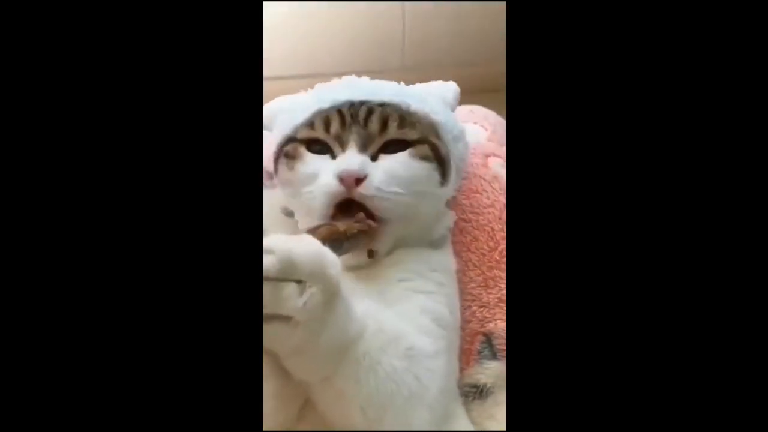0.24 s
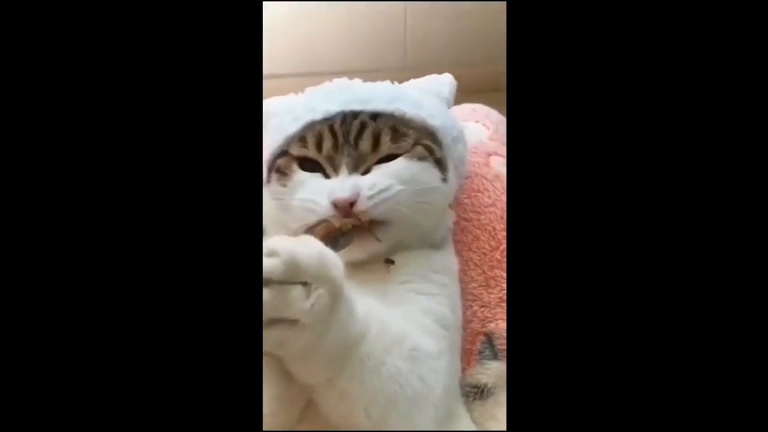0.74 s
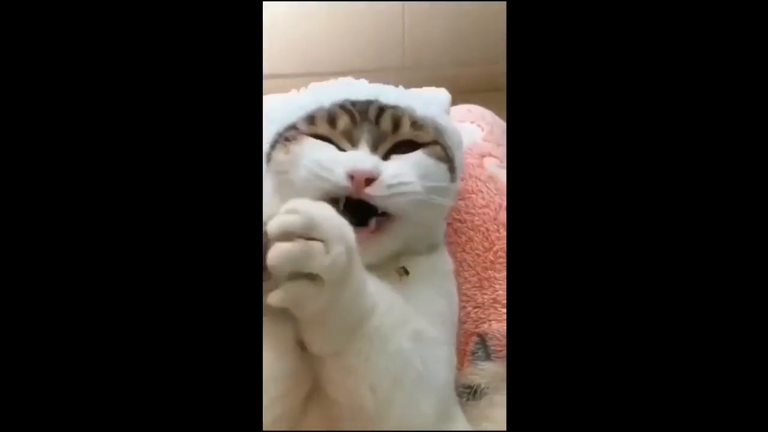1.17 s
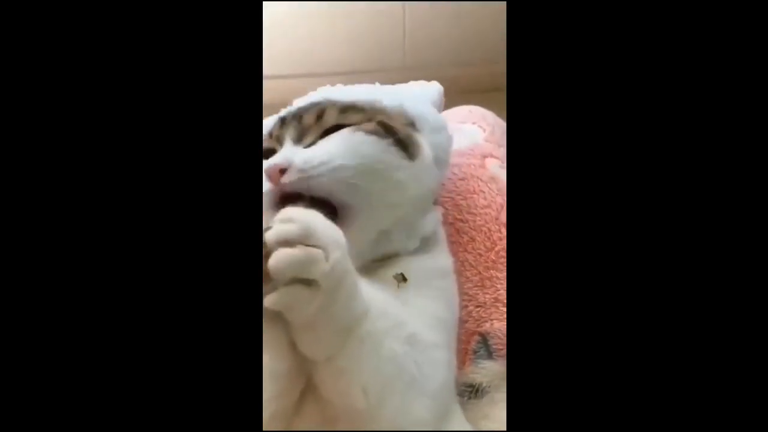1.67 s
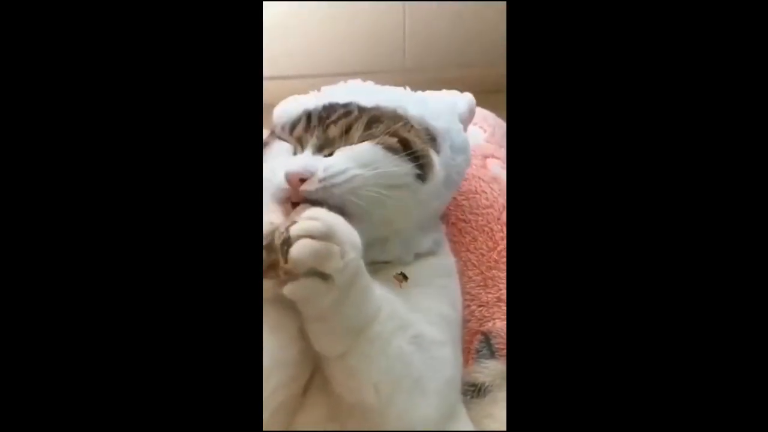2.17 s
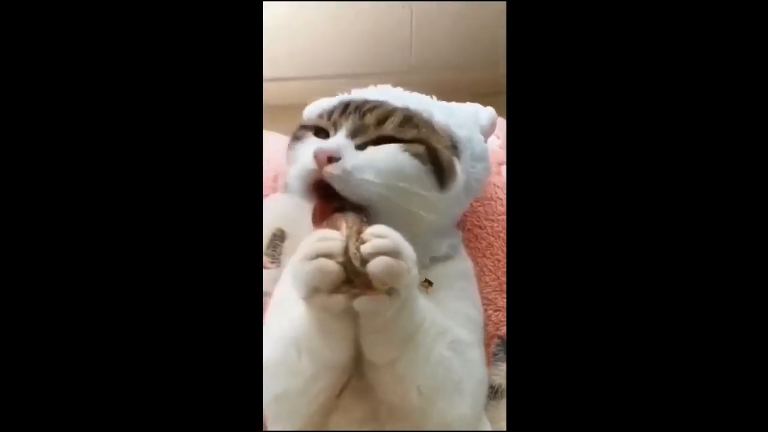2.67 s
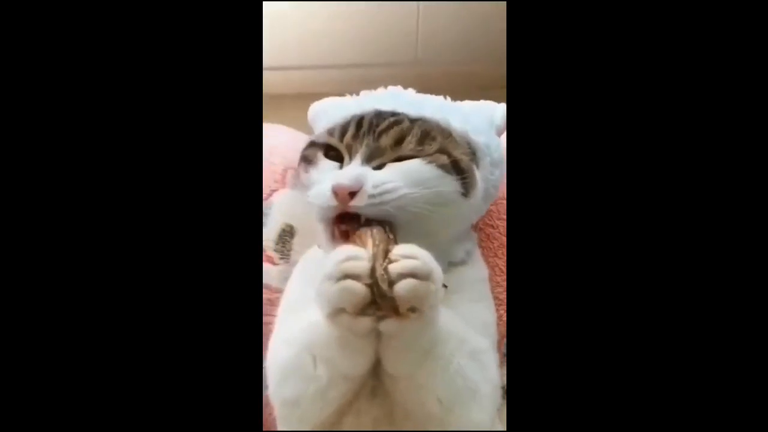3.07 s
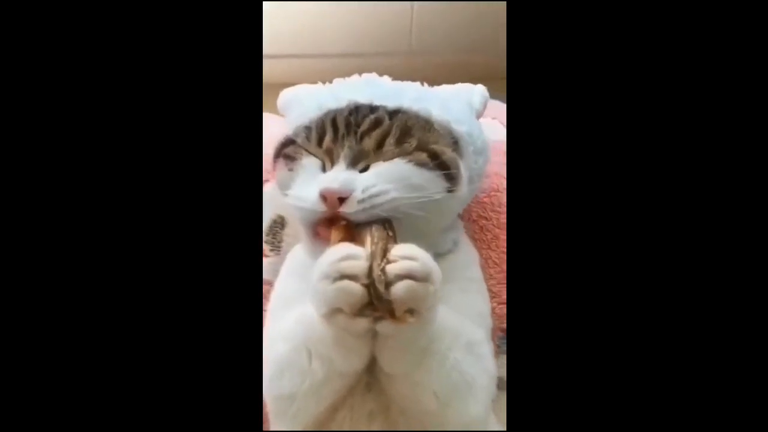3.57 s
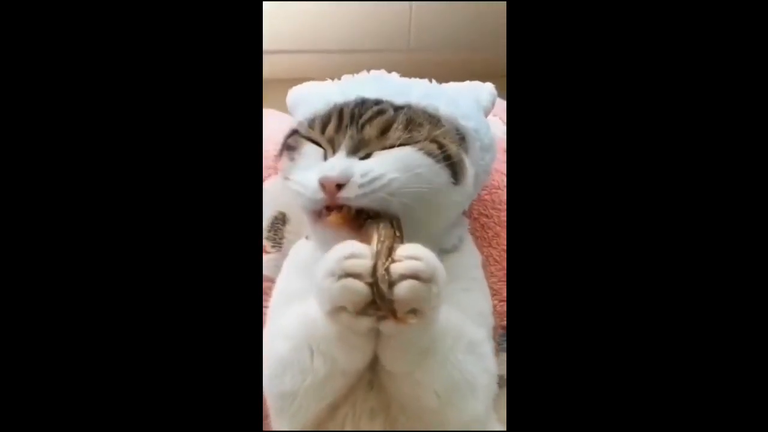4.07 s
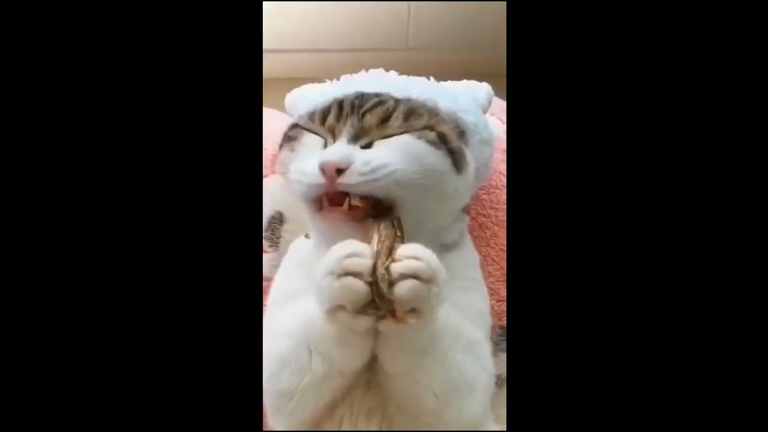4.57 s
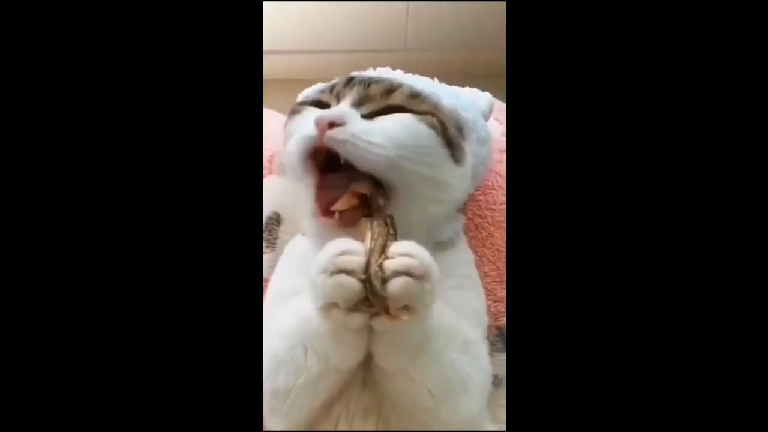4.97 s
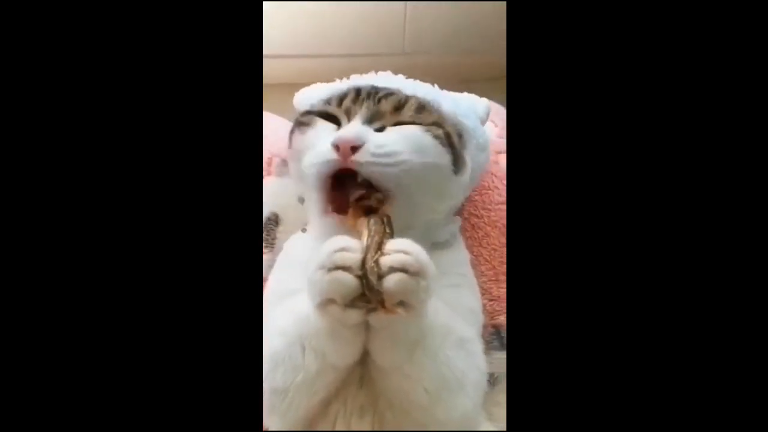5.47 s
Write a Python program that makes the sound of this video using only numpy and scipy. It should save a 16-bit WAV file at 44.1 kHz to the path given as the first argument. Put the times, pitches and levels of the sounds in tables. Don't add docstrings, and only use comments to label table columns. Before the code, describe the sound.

Close, loud crunching as a cat's teeth crack and grind a brittle treat, over air rumble and faint quiet-room hush.

```python
import sys
import numpy as np
from scipy import signal
from scipy.fft import rfft, irfft
from scipy.io import wavfile
from scipy.ndimage import uniform_filter1d

SR = 44100
rng = np.random.default_rng(int(sys.argv[2]) if len(sys.argv) > 2 else 0)


def int16_out(signal):
    q = np.round(np.clip(np.atleast_2d(signal).T, -1, 1) * 32767)
    wavfile.write(sys.argv[1], SR, q.astype(np.int16))


def boost_factor(decibels):
    exponent = np.asarray(decibels, float) / 20
    return 10 ** exponent


N = 252693

# frequency in Hz, density in dB per Hz.
ROOM_TONE = [(41, -32), (70, 3), (634, -17), (1410, -18), (2620, -22), (5070, -25.5), (9600, -36.5),
             (12500, -74)]
# start in seconds, hold in seconds, level in dB, swing in Hz.
PUFFS = [(0.0, 0.11, -11, 36.2), (0.164, 0.025, -10, 28.33), (.24, 0.048, -20, 35.2),
         (0.321, 0.11, -9.5, 33.5), (.5, 0.076, -17, 40.1), (.655, 0.022, -14.5, 36.3),
         (.73, 0.088, -21.5, 42.15), (0.881, 0.058, -24, 42), (1.011, .04, -27.5, 43.15),
         (1.339, 0.076, -29, 52.2), (1.66, 0.029, -26, 43.05), (2.2, .03, -34, 44.8),
         (2.525, 0.082, -8.5, 38.1), (2.681, 0.074, -6.5, 34.35), (2.792, 0.044, -4.5, 34.4),
         (2.99, 0.056, -27, 48.1), (3.09, 0.077, -23, 58.8), (3.23, 0.044, -23.5, 49.6),
         (3.549, 0.12, -35, 43.03), (3.992, 0.032, -14.5, 43.8), (4.039, 0.056, -24, 46.8),
         (4.2, 0.16, -17.5, 43.84), (4.888, 0.047, -19, 44.3), (5.04, 0.033, -29.5, 44.1),
         (5.22, .13, -30, 44.5), (5.45, 0.043, -31, 43.5)]
# frequency in Hz, width in Hz, level in dB.
CRUMB_MODES = [(1725, 400, -4.5), (2550, 565, -1.5), (3300, 1075, -6.5)]
# frequency in Hz, width in Hz, level in dB.
JAW_MODES = [(280.5, 168, 3), (433, 82, 6.5), (508, 101, 4.5), (1110, 330, 6.5), (1270, 1500, -10.5)]
# frequency in Hz, width in Hz, level in dB.
BRITTLE_MODES = [(4184, 540, 7.5), (6380, 1620, 8), (8670, 1700, 2.5), (8964, 390, 4.5)]
# middle in
# seconds, half length in seconds, ring in Hz, width in Hz, level in dB.
LICKS = [(0.043, 0.049, 1132, 80, -33.5), (0.074, 0.019, 2100, 600, -29), (0.374, 0.027, 2000, 600, -35),
         (0.429, 0.027, 2370, 583.2, -29.5), (0.78, 0.038, 2320, 460, -37),
         (0.914, 0.025, 1020, 270, -31.5), (0.928, 0.033, 1790, 320, -36), (1.755, 0.059, 284, 100, -27),
         (1.769, 0.024, 1200, 230, -22.5), (1.973, 0.06, 1081, 324, -17.5), (2.588, 0.015, 349, 190, -17.5),
         (3.404, 0.0083, 1080, 340, -12), (3.635, 0.014, 9200, 600, -26.5), (3.762, 0.1, 1850, 450, -30),
         (3.907, 0.026, 3300, 460, -17), (4.406, 0.022, 9140, 600, -34), (4.468, 0.029, 1809, 200, -31.5),
         (4.65, 0.049, 2840, 540, -16.5), (4.86, 0.038, 9050, 603, -27.5), (5.645, 0.12, 2570, 370, -37)]
# start in seconds, peak in dB, ring in Hz, T60 in seconds.
KNOCKS = [(0.746, -21, 506, 0.021), (0.869, -14.5, 384, 0.081), (1.093, -17.5, 319.6, 0.05),
          (1.217, -1.5, 1110, 0.027), (1.266, -4, 1034, 0.063), (1.344, -9, 946, 0.033),
          (1.466, -6, 567, 0.041), (1.55, -12.5, 950, 0.019), (1.767, -10, 1095, 0.045),
          (1.9, -3, 1306, 0.044), (1.945, -0.5, 1170, 0.06), (2.009, 1, 1110, 0.058),
          (2.215, -6, 1496, 0.15), (2.331, -5, 1490, 0.03), (2.389, -13, 1360, 0.047),
          (2.431, -7, 485, 0.05), (2.583, -24, 367, 0.05), (3.274, -8.5, 416, 0.027),
          (3.399, -5, 480, 0.063), (3.474, -17, 951, 0.028), (3.521, -11.5, 1010, 0.025),
          (3.965, -7, 330, 0.057), (4.084, -12.5, 500, 0.034), (4.209, -9, 484, 0.021),
          (4.25, -1.5, 477, 0.068), (4.743, -6, 396, 0.064), (4.849, -3.5, 411, 0.066),
          (5.205, -12, 990, 0.075), (5.245, -5, 1090, 0.04), (5.459, -6, 395, 0.068)]
# time in seconds, peak in dB, ring in Hz,
# splinters in dB above the ring.
FIRST_CRACKS = [(0.3386, -2, 2150, -35), (0.7442, -5, 2320, -39), (0.841, -7.5, 3960, -18),
                (1.1073, 1, 2590, -24), (1.1787, -9, 2420, -21), (1.2193, 3.5, 2480, -30),
                (1.269, 5.5, 1760, -25), (1.3068, -1.5, 2270, -13.5), (1.3473, 3, 2270, -13),
                (1.3877, -10, 2470, -12), (1.4103, -4, 2430, -8.5), (1.4568, 0, 2520, -5.5),
                (1.5508, -6.5, 2580, -23), (1.6626, -5, 2230, -9), (1.7386, -10, 2300, -3.5),
                (1.9054, 4, 2220, -14), (1.9383, 8, 2080, -18), (2.0316, -8, 2460, -2.5),
                (2.058, -21, 2550, -7), (2.112, -3.5, 2230, -8), (2.1304, -1.5, 2430, -7),
                (2.1964, -2.5, 2900, -10), (2.271, -0.5, 2480, -9.5), (2.3922, 2, 2380, -18),
                (2.43, 3, 3700, -14), (2.5397, -1, 2314, -12.5), (2.5804, -5, 2950, -28),
                (2.606, -7, 2424, -20), (2.6873, -1, 2270, -17), (2.7926, -8, 2267, -10)]
# time in seconds, peak in dB, ring in Hz,
# splinters in dB above the ring.
LATER_CRACKS = [(2.8898, -11, 2458, -8), (3.1812, -14, 2412, -7), (3.216, -9, 2314, -32),
                (3.256, -15, 2560, -8), (3.3978, -5.5, 2060, -8), (3.4753, -9.5, 2423, -1.5),
                (3.5144, -5.5, 2540, -3), (3.6252, -13.5, 2200, -7.5), (3.665, -6, 1750, -16.5),
                (3.7344, -13.5, 2800, -31), (3.8429, -16.5, 3180, -2), (3.8778, -7, 3230, -27),
                (3.9007, 2.5, 2810, -11), (3.966, 0.5, 2570, -12.5), (4.0826, -8, 2870, 0),
                (4.1173, -6, 1930, -2), (4.206, -11.5, 2560, -2.5), (4.2496, -10, 1880, -6),
                (4.4398, -11.5, 1720, -15), (4.5905, -28, 2940, -10), (4.6244, -8, 2460, -14),
                (4.6526, -12, 2880, -1), (4.6737, -7, 3000, -18), (4.735, -1, 2980, -6.5),
                (4.9422, -17, 3230, -5), (5.1627, -14.5, 4500, -1), (5.2235, 0.5, 3170, -11),
                (5.2795, -2.5, 2790, -22), (5.313, -5.5, 3580, -4), (5.461, -9, 1900, -2)]
# time in seconds, peak in dB, ring in
# Hz, splinters in dB # above the ring.
MORE_CRACKS = [(0.414, -12.5, 2500, -41), (0.6549, -18, 4400, -13), (0.8739, -16.5, 4660, 1.5),
               (1.1902, -3.5, 2370, -26), (1.3314, -8, 2320, -8), (2.0135, -8, 2500, -6),
               (2.2168, 1.5, 2810, -4), (2.3118, -8, 1790, -6.5), (2.7048, -4, 1860, -19),
               (3.5553, -7, 4430, -15), (4.3869, -23.5, 2360, -2.5), (4.563, -13, 3100, -8),
               (4.802, -14, 4700, -12), (4.8474, -14, 3900, -4), (5.1766, -0.5, 4300, -12),
               (5.2455, -13, 2780, -2), (5.2587, -4, 3060, -14), (5.3453, -23, 4500, 4),
               (5.4355, -13.5, 4400, -0.5)]
# start in seconds, hold in seconds, crumb in dB, brittle shell in dB above the crumb,
# jaw in dB above the crumb.
CHEWS = [(1.265, .11, -15.5, -18, -5), (1.395, .1, -12.5, -7.5, -10), (1.785, 0.11, -29.5, -35, -6),
         (1.897, .15, -13.5, -7, -7.5), (2.058, .38, -17, 1, -8), (2.448, 0.14, -11.5, -8.5, -14),
         (2.669, 0.12, -18.5, -8.5, -10.5), (2.886, 0.11, -13, -1, -10), (3.07, .1, -39, 11, 3),
         (3.214, 0.046, -17.5, 2.5, -12), (3.248, .09, -17, -1, -10.5), (3.47, 0.075, -26, -1.5, -7.5),
         (3.867, 0.078, -20, -3, -9), (3.965, 0.057, -20.5, 3.5, -4.5), (4.27, 0.046, -43, -12, 1.5),
         (4.529, 0.049, -32, 0, -12), (4.592, 0.093, -19.5, 2.5, -9), (4.792, 0.055, -25.5, 4, -4),
         (5.141, .03, -29.5, 3, -21), (5.174, .11, -17.5, 2, -6), (5.29, .1, -22, 0.5, -6),
         (5.0, .1, -41.5, -2, -13), (5.54, 0.063, -32, 0, -21)]
# start in seconds, crumb in dB, brittle shell in dB above the crumb,
# jaw in dB above the crumb.
NIPS = [(.6, -45, 3.5, -12), (0.837, -30.5, 0.5, -14), (1.105, -26, -30, -14), (1.18, -27, -19, -3),
        (1.53, -29.5, -16, 2), (1.653, -25, -9, -4.5), (1.735, -25, -11, -4), (3.39, -23, -3, -3),
        (3.622, -27, -3, -2.5), (3.732, -21.5, -11, -15.5), (4.082, -22, 2.5, -4.5), (4.206, -25, -2.5, 2),
        (4.25, -31, -4, 6), (4.73, -24, -6, -4), (5.454, -25.5, 3.5, -1.5)]


def unit(x):
    return x / np.sqrt(np.mean(x ** 2) + 1e-20)


def drift(rate):
    r = np.exp(-2 * np.pi * rate / SR)
    noise = rng.standard_normal(N + SR)
    settled = signal.lfilter([1], [1, -2 * r, r * r], noise)[SR:]
    return unit(settled)


def resonate(x, hz, width):
    r = np.exp(-np.pi * width / SR)
    zeros = [(1 - r * r) / 2, 0, (r * r - 1) / 2]
    poles = [1, -2 * r * np.cos(2 * np.pi * hz / SR), r * r]
    return signal.lfilter(zeros, poles, x)


def body(x, modes, patchy_db=0):
    out = 0
    for k, (hz, width, db) in enumerate(modes):
        patch = boost_factor(patchy_db * drift(15.0)) if patchy_db else 1
        out = out + (-1) ** k * boost_factor(db) * patch * resonate(x, hz, width)
    return out


def fractures(size, per_s, spread_db):
    strength = np.minimum(rng.exponential(1, size), 4)
    height = boost_factor(spread_db * strength) * rng.choice([-1, 1], size)
    return height * (rng.random(size) < per_s / SR) + 1e-9


def shower(t60, snap_db):
    t = np.arange(4000) / SR
    t60 = np.clip(t60, .004, .25)
    swell = (1 - np.exp(-t / (0.052 * t60))) ** 2
    decay = boost_factor(-60 * (t / t60) ** 1.42)
    out = decay * swell * fractures(len(t), 7000, spread_db=1.5)
    out[50] += boost_factor(snap_db)
    return out


def add(out, s, peak_db, sound):
    at = max(round((s - .0012) * SR), 0)
    scaled = boost_factor(peak_db) * sound / np.abs(sound).max()
    out[at:at + len(sound)] += scaled[:N - at]


def swells(s, held_s, db, attack_s, sag_db_per_s, release_db_per_s, rest_db):
    t = np.arange(N) / SR
    power = boost_factor(2 * rest_db)
    for start, held, top in zip(s, np.clip(held_s, .005, 2), db):
        since = t - start
        fall = sag_db_per_s * np.clip(since, 0, held) + release_db_per_s * np.clip(since - held, 0, 1)
        rise = np.exp(4 * np.minimum(since, 0) / attack_s)
        power = power + boost_factor(2 * (top - fall)) * rise
    return np.sqrt(power)


def room_tone():
    hz, db = np.transpose(ROOM_TONE)
    grid = np.maximum(np.arange(N // 2 + 1) * SR / N, 1)
    shape = boost_factor(np.interp(np.log(grid), np.log(hz), db))
    hush = irfft(rfft(rng.standard_normal(N)) * shape, N)
    return boost_factor(-34) * unit(hush)


def rumble():
    s, held, db, puff_hz = np.transpose(PUFFS)
    hz = np.interp(np.arange(N) / SR, s, puff_hz)
    swing_hz = hz * np.exp(0.127 * drift(16.7))
    swing = np.sin(2 * np.pi * np.cumsum(swing_hz) / SR) * boost_factor(1.5 * drift(25))
    heave_hz = 1.3 * hz * np.exp(0.141 * drift(9.9))
    heave = np.sin(2 * np.pi * np.cumsum(heave_hz) / SR) * boost_factor(3.2 * drift(7.5))
    low_band = signal.butter(2, [20, 80], "band", fs=SR, output="sos")
    flutter = signal.sosfilt(low_band, rng.standard_normal(N))
    air = swells(s, held, db, attack_s=0.018, sag_db_per_s=0, release_db_per_s=343.5, rest_db=-33.5)
    return air * unit(unit(swing) + 0.67 * heave + 0.42 * unit(flutter))


def licks():
    t = np.arange(N) / SR
    rub = fractures(N, 6000, spread_db=2.0)
    out = np.zeros(N)
    for s, half, hz, width, db in LICKS:
        stroke = np.exp(-((t - s) / half) ** 2)
        out += boost_factor(db) * stroke * unit(resonate(resonate(rub, hz, width), hz, width))
    return out


def knocks():
    out = np.zeros(N)
    for s, peak_db, hz, t60 in KNOCKS:
        breaks = shower(0.8 * t60, snap_db=12)
        ring = resonate(resonate(breaks, hz, 310), hz, 133)
        ring = ring + 0.089 * body(breaks, JAW_MODES)
        ring = ring + 0.18 * body(breaks, CRUMB_MODES) + 0.014 * body(breaks, BRITTLE_MODES)
        add(out, s, peak_db - 1.0, ring)
    return out


def stick():
    t = np.arange(N) / SR
    hush_db = np.zeros(N)
    for s, peak_db, *_ in FIRST_CRACKS + LATER_CRACKS + MORE_CRACKS:
        ahead = np.clip(s - t, 0, 1)
        depth_db = np.clip(.3 * (peak_db + 23), 0, 9)
        hush_db += (t < s) * depth_db * np.exp(-(ahead / .012) ** 2)
    return boost_factor(-hush_db)


def grinding():
    nip_held_s = 0.027
    bites = CHEWS + [(s, nip_held_s, *db) for s, *db in NIPS]
    s, held, crumb_db, top_db, jaw_db = np.transpose(bites)
    slips = boost_factor(1.5 * drift(35) + 1.2 * drift(150) + 0.6 * drift(430))
    shared = fractures(N, 2200, spread_db=3.5)
    # resonances, bite dB, release in dB per second, dB of the mouth working between bites
    parts = (
        (CRUMB_MODES, crumb_db, 199.5, -43.5),
        (BRITTLE_MODES, crumb_db + top_db, 220, -50.5),
        (JAW_MODES, crumb_db + jaw_db, 148, -47.5),
    )
    out = 0
    for modes, db, release, rest_db in parts:
        breaks = slips * (shared + 1.7 * fractures(N, 5000, spread_db=1.5))
        bite = swells(s, held, db, .012, -2.5, release, rest_db)
        out = out + bite * unit(body(breaks, modes, patchy_db=1.6))
    return out


def cracks():
    out = np.zeros(N)
    for s, peak_db, hz, top_db in FIRST_CRACKS + LATER_CRACKS + MORE_CRACKS:
        t60 = .027 * (1.5 + 0.04 * peak_db)
        snap_db = 5.5 - 0.55 * top_db
        breaks = shower(t60, snap_db)
        ring = resonate(resonate(breaks, hz, 900), hz, 800) + 0.081 * body(breaks, CRUMB_MODES)
        add(out, s, peak_db - 0.6, ring)
        add(out, s, peak_db + top_db + 6.5, body(breaks, BRITTLE_MODES))
    return out


def scene():
    mouth = stick() * grinding() + cracks() + knocks() + licks()
    dulled = signal.lfilter([.4], [1, -.6], mouth)
    echo = boost_factor(-20.0) * np.roll(dulled, round(.0047 * SR))
    return (mouth + echo + rumble() + room_tone())[None]


def dropouts(x, share, depth_db):
    hz, s, bins = signal.stft(x, SR, nperseg=1024)
    starved = rng.random((len(hz) // 6 + 1, len(s) // 4 + 1)) < np.clip(share, 0, 1)
    starved = starved.repeat(6, axis=0).repeat(4, axis=1)[:len(hz), :len(s)]
    starved = starved & (hz[:, None] > 650)
    return signal.istft(bins * boost_factor(-depth_db * starved), SR, nperseg=1024)[1][:N]


def whistle(cut):
    top_band = signal.butter(2, [7500, 9600], "band", fs=SR, output="sos")
    top = signal.sosfilt(top_band, cut)
    level = np.sqrt(uniform_filter1d(top ** 2, size=1500) + 1e-12)
    on = uniform_filter1d(1. * (drift(9) > -.1), size=500)
    return boost_factor(-22.5) * level * on * np.sin(2 * np.pi * 10164 * np.arange(N) / SR)


def low_pass(x):
    return signal.sosfilt(signal.butter(12, 15900, fs=SR, output="sos"), x)


def record(dry):
    limited = 1.034 * np.tanh(dry[0] / 1.226)
    held = dropouts(limited, share=.1, depth_db=14.0)
    top_cut = signal.ellip(12, .3, 80, 9680, fs=SR, output="sos")
    cut = signal.sosfilt(top_cut, held)
    mix = np.clip(cut + whistle(cut), -.99, .99)[None]
    return low_pass(mix)


dry = scene()
out = record(dry)
int16_out(out)
```